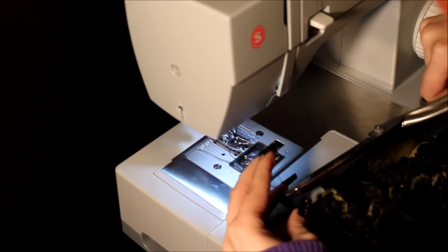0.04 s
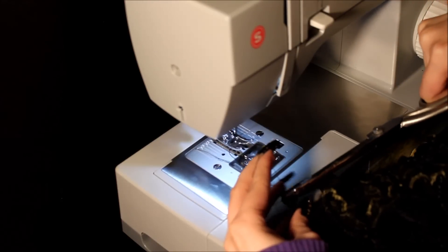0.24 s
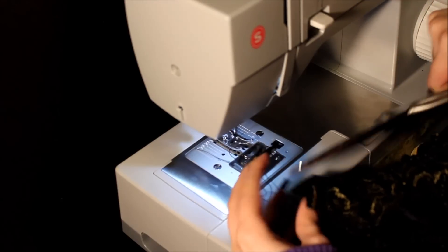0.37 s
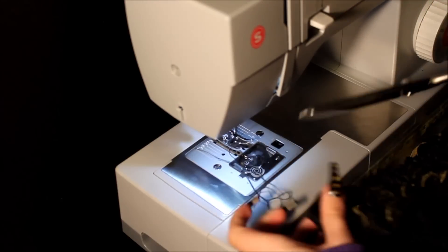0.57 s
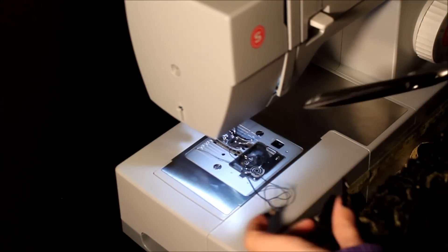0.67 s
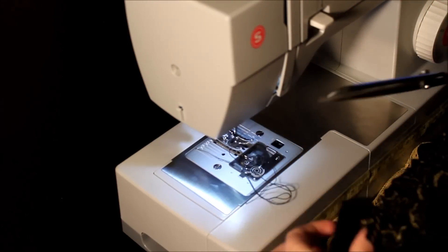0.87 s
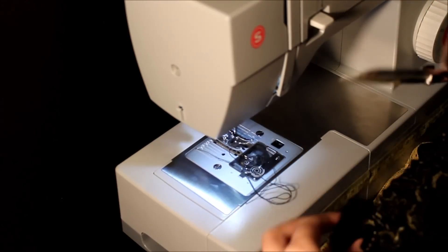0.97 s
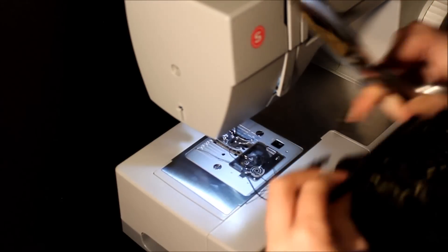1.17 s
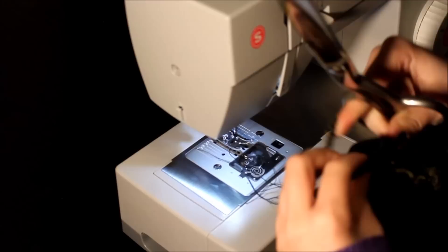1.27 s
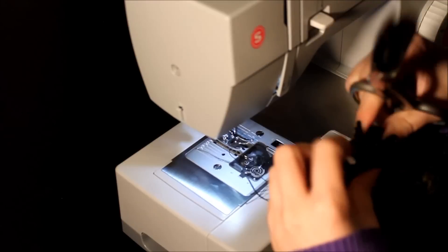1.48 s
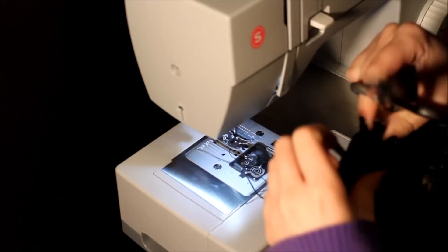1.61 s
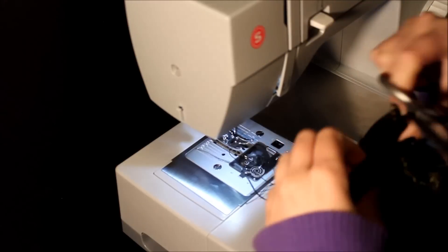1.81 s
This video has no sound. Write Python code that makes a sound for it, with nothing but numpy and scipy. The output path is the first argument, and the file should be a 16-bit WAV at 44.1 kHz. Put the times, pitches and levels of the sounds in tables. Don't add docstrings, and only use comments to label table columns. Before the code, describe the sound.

A sharp scissor snip, steel blades sliding open, then cloth rustle and a small thread snap.

```python
import sys
import numpy as np
from scipy import signal
from scipy.fft import rfft, irfft, next_fast_len
from scipy.io import wavfile
from scipy.ndimage import uniform_filter1d, map_coordinates

SR = 44100
rng = np.random.default_rng(int(sys.argv[2]) if len(sys.argv) > 2 else 0)


def generate_wav(signal):
    frames = np.transpose(np.atleast_2d(signal))
    scaled = np.clip(frames, -1, 1) * 32767
    pcm = np.round(scaled).astype(np.int16)
    wavfile.write(sys.argv[1], SR, pcm)


def rack_gain(trim_db):
    fader = np.asarray(trim_db, float)
    return 10 ** (fader / 20)


N = 81585


def unit(x):
    return x / np.sqrt(np.mean(x ** 2) + 1e-20)


def along(points, hz):
    f, v = np.transpose(points)
    return np.interp(np.log(hz + 1), np.log(f + 1), v)


def filtered(x, response):
    m = next_fast_len(len(x) + 8192)
    return irfft(rfft(x, m) * response(np.fft.rfftfreq(m, 1 / SR)), m)[:len(x)]


def resonant(x, peaks, shift=1):
    def response(f):
        total = 0
        for k, (centre, width, db) in enumerate(peaks):
            damping = 1j * f * width
            total = total + (-1) ** k * rack_gain(db) * damping / ((centre * shift) ** 2 - f * f + damping)
        return total
    return filtered(x, response)


def wobble(rate_hz, n):
    knots = rng.standard_normal(int(N * rate_hz / SR) + 4)
    return map_coordinates(knots, [np.arange(n) * rate_hz / SR])


def add(out, start_s, x):
    i = round(start_s * SR)
    out[i:i + len(x)] += x[:len(out) - i]


def stroke(length_s, rate_hz, grit_db, lean):
    n = int(2 * length_s * SR)
    u = np.arange(n) / SR / length_s
    shape = np.sin(np.pi * np.clip(u, 0, 1) ** lean) ** .6
    grit = rng.standard_normal(n) * rack_gain(grit_db * wobble(rate_hz, n))
    return unit(grit), shape


# pitch_hz, density_db
HISS_COLOUR = [(20, -50), (32, -35), (45, 0), (100, -20), (180, -5.5), (1000, -11), (5000, -14.5),
               (15900, -20.5)]
HUM_HZ, HUM_WIDTH_HZ, HUM_DB = 103, 11, -64
HISS_DB = -55.5


def floor():
    hiss = unit(filtered(rng.standard_normal(N), lambda hz: rack_gain(along(HISS_COLOUR, hz))))
    hum = unit(resonant(rng.standard_normal(N), [(HUM_HZ, HUM_WIDTH_HZ, 0)]))
    return rack_gain(HISS_DB + 0.21 * wobble(5.05, N)) * hiss + rack_gain(HUM_DB) * hum


# delay_s, level_db
NEAR_SURFACES = [(.0021, -10), (.004, -6), (.0074, -6), (.0092, -13), (.0111, -10), (.0125, -10),
                 (.0155, -14)]
# pitch_hz, t60_s
ROOM_DECAY = [(500, 0.17), (2000, 0.36), (6000, 0.21), (12000, .22), (16000, 0.19)]
ROOM_DB, ROOM_START_S = -1.5, 0.0013


def room(x):
    hz, t, z = signal.stft(rng.standard_normal(SR // 2), SR, nperseg=256)
    decay = rack_gain(-60 * t / along(ROOM_DECAY, hz)[:, None])
    tail = signal.istft(z * decay, SR, nperseg=256)[1]
    tail = tail * (1 - np.exp(-np.arange(len(tail)) / SR / ROOM_START_S))
    answer = rack_gain(ROOM_DB) * tail / np.linalg.norm(tail)
    smear = rng.standard_normal((len(NEAR_SURFACES), 8)) * rack_gain(-7 * np.arange(8))
    for (delay_s, db), echo in zip(NEAR_SURFACES, smear):
        add(answer, delay_s, rack_gain(db) * echo / np.linalg.norm(echo))
    answer[0] = 1
    return signal.fftconvolve(x, answer)[:N]


# start_s, level_db, pitch_hz
TABLE_NUDGES = [
    (0.131, -50.5, 75),
    (0.579, -46, 125),
    (.63, -47, 111),
    (1.209, -63, 94),
    (1.32, -51, 233),
]
THUMP_CYCLES = 1.95


def thumps():
    out, t = np.zeros(N), np.arange(SR // 5) / SR
    for start_s, db, hz in TABLE_NUDGES:
        u = t * hz / THUMP_CYCLES
        add(out, start_s, rack_gain(db) * 4 * u * np.exp(-2 * u) * np.sin(2 * np.pi * hz * t))
    return out


# start_s, length_s, level_db
FOLDS = [
    (1.028, 0.052, -60.5),
    (1.103, 0.044, -55.5),
    (1.168, 0.27, -65.5),
    (1.32, 0.079, -60),
    (1.606, 0.018, -57),
    (1.627, 0.024, -54.5),
    (1.671, .05, -57),
]
# pitch_hz, density_db
FOLD_COLOUR = [(400, -11), (2500, 0.5), (6000, -3), (12000, -2.5), (16000, -5.5)]


def rustles():
    out = np.zeros(N)
    for start_s, length_s, db in FOLDS:
        grit, shape = stroke(length_s, 900, grit_db=3, lean=.6)
        rustle = unit(filtered(grit, lambda hz: rack_gain(along(FOLD_COLOUR, hz))))
        add(out, start_s, rack_gain(db) * shape * rustle)
    return out


# start_s, length_s, level_db, fizz_db
CLOTH_PULLS = [
    (0.287, 0.048, -47, -9),
    (.32, 0.027, -52, -2),
    (.58, 0.14, -58.5, -3.5),
    (.97, 0.053, -59.5, 6),
    (1.247, 0.065, -50.5, 4.5),
    (1.29, 0.036, -47, 4.5),
    (1.32, 0.042, -54, 6.5),
]
# pitch_hz, width_hz, level_db
BED_MODES = [(235, 30, 0), (645, 50, -7), (855, 40, 2), (995, 45, -2), (1700, 300, -14)]
# pitch_hz, width_hz, level_db
WEAVE_FIZZ = [(2260, 2900, -14.5), (3330, 220, -1.5), (3420, 180, -1.5), (4260, 330, -2)]


def drags():
    out = np.zeros(N)
    for start_s, length_s, db, fizz_db in CLOTH_PULLS:
        grit, shape = stroke(length_s, 206.6, grit_db=3.0, lean=0.67)
        hum = resonant(grit * shape, BED_MODES)
        fizz = rack_gain(fizz_db - 10.5) * resonant(grit * shape, WEAVE_FIZZ)
        add(out, start_s, rack_gain(db) * 4 * (hum + fizz))
    return out


# start_s, level_db, pitch_hz, decay_cycles
TOUCHES = [(.599, -44, 13000, 3), (.826, -42, 4550, 3), (0.826, -42, 14700, 44), (1.010, -46, 14500, 25),
           (1.038, -44.5, 2500, 2.6), (1.038, -41, 12000, 4.4), (1.066, -42, 12500, 3),
           (1.1115, -31, 3700, 0.89), (1.111, -23, 13600, 2), (1.117, -40, 14500, 4),
           (1.134, -39, 11400, 4.8), (1.325, -36, 14000, 4.1), (1.348, -40.5, 11100, 5),
           (1.356, -48, 14000, 3), (1.381, -32.5, 12800, 3.3), (1.42, -33.5, 12500, 2.7),
           (1.608, -32, 830, 0.27), (1.6056, -37, 3000, 0.76), (1.6288, -31, 3420, 1.2),
           (1.6286, -41.5, 8000, 2), (1.683, -37.5, 1550, 0.68), (1.754, -42.5, 3580, 2.6)]


def ticks():
    out, t = np.zeros(N), np.arange(SR // 50) / SR
    for start_s, db, hz, cycles in TOUCHES:
        noise = unit(resonant(rng.standard_normal(len(t)), [(hz, hz / 3, 0)]))
        pulse = np.sin(2 * np.pi * hz * t) + .5 * noise
        add(out, start_s, rack_gain(db) * pulse * np.exp(-t * hz / cycles))
    return out


# start_s, level_db, pitch_factor
FIBRES = [
    (1.4744, -20, 1.35),
    (1.4771, -31, 1.05),
    (1.4783, -15, 1.0),
    (1.4812, -23, 1.05),
]
# pitch_hz, width_hz, level_db
THREAD_MODES = [(500, 500, -15), (1250, 400, -8), (2800, 1500, -6), (4700, 1800, 5), (7800, 2200, 4),
                (10200, 2000, 0), (13300, 2500, 0)]


def snaps():
    out, t = np.zeros(N), np.arange(SR // 100) / SR
    for start_s, db, pitch in FIBRES:
        fray = .4 * rng.standard_normal(len(t)) * rack_gain(-60 * t / 0.0021)
        burst = (t == 0) + fray
        add(out, start_s, rack_gain(db + 3.5) * resonant(burst, THREAD_MODES, pitch))
    return out


# start_s, length_s, level_db, pitch_factor
BLADE_RUBS = [
    (.157, .02, -52, 1.0),
    (.217, .005, -54, 1.0),
    (.598, .012, -48, 1.03),
    (.611, .022, -44, .99),
    (.680, .012, -52, .9),
    (.694, .02, -46, 1.005),
    (.710, .021, -46, 1.0),
    (.826, .008, -55, 1.03),
]
# pitch_hz, width_hz, level_db
RUBBED_STEEL = [(3360, 200, -4.5), (5100, 1000, -12), (7060, 350, -5), (9330, 510, -8), (10360, 390, -3.5),
                (11400, 350, -6.5), (12000, 660, -4), (13950, 370, 0), (14100, 140, -1), (15200, 600, -16)]
RUB_DB = 7.5


def slides():
    out = np.zeros(N)
    for start_s, length_s, db, pitch in BLADE_RUBS:
        grit, shape = stroke(length_s, 600, grit_db=3, lean=.75)
        add(out, start_s, rack_gain(db + RUB_DB) * resonant(grit * shape, RUBBED_STEEL, pitch))
    return out


# start_s, level_db, contact_s
BLADE_CONTACTS = [
    (.1590, -41, .0012),
    (.22185, -10, .0003),
]
# pitch_hz, level_db, t60_s
BLADE_MODES = [(3000, -8, .009), (3800, -1, .005), (4700, -2, .005), (5300, -7, .004), (6400, -1, .005),
               (7700, 2, .004), (9600, 8, .005), (11250, -2, .012), (11600, -2, .012), (12300, 2, .004),
               (12700, -3, .013), (13600, 1, .004), (14200, -1, .013), (15200, -3, .004)]
# pitch_hz, level_db, t60_s
HANDLE_KNOCK = [(830, -38, 0.0037), (1220, -27.5, 0.0026), (1630, -17, 0.0054)]
CRACK_DB, CRACK_T60_S = 4, .006
THIN_HZ = 700


def snips():
    out, t = np.zeros(N), np.arange(SR // 8) / SR
    for start_s, db, contact_s in BLADE_CONTACTS:
        ring = np.zeros(len(t))
        for hz, level, t60 in BLADE_MODES:
            ring += rack_gain(level - 60 * t / t60) * np.sin(2 * np.pi * (hz * t + rng.random()))
        crack = rack_gain(CRACK_DB - 60 * t / CRACK_T60_S) * np.diff(rng.standard_normal(len(t) + 1))
        knock = np.zeros(len(t))
        for hz, level, t60 in HANDLE_KNOCK:
            knock += rack_gain(level - 60 * t / t60) * np.sin(2 * np.pi * hz * t)
        onset = 1 - np.exp(-t / contact_s)
        add(out, start_s, rack_gain(db - 1.5) * (onset * (ring + crack) + knock))
    return signal.sosfilt(signal.butter(3, THIN_HZ, 'high', fs=SR, output='sos'), out)


NEAR_DB = -5


def scene():
    near = ticks()
    blades = room(snips())
    rubbing = room(slides() + drags() + rustles())
    small = room(snaps() + rack_gain(NEAR_DB) * near) + (1 - rack_gain(NEAR_DB)) * near
    mono = blades + rubbing + small + thumps() + floor()
    return np.array([mono, mono])


def below(hz, top_hz):
    return np.sin(np.pi / 2 * np.clip((top_hz - hz) / 250 + .5, 0, 1)) ** 2


def roll_off(x):
    return signal.sosfilt(signal.butter(12, 17160, fs=SR, output="sos"), x)


DUCK_S, DUCK_DB, HOLD_S, RECOVER_S = 0.23, -3.5, 0.19, 0.29
RISE_DB = 0.5
TOP_HZ, LOUD_TOP_HZ, LOUD_DB = 15800, 16950, -25
SPILL_LOW_DB, SPILL_HIGH_DB = -49, -30


def record(dry):
    t = np.arange(N) / SR - DUCK_S
    duck = (t > 0) * np.clip(1 - (t - HOLD_S) / RECOVER_S, 0, 1)
    x = dry[0] * rack_gain(DUCK_DB * duck + RISE_DB * np.clip(t, 0, 1))

    power = uniform_filter1d(x * x, size=150)
    loud = uniform_filter1d(1. * (power > rack_gain(LOUD_DB) ** 2), size=300)
    top = filtered(x, lambda hz: (1 - below(hz, TOP_HZ)) * rack_gain(-12 * np.abs(hz - TOP_HZ) / 1000))
    x = filtered(x, lambda hz: below(hz, TOP_HZ)) + filtered(loud * top, lambda hz: below(hz, LOUD_TOP_HZ))

    def spill(hz):
        return rack_gain(np.where(hz > 4000, SPILL_HIGH_DB * (1 + hz / 40000), SPILL_LOW_DB))

    side = filtered(np.roll(x, 37) * (.02 + loud), spill)
    return roll_off(np.array([x + side, x - side]))


dry = scene()
out = record(dry)
generate_wav(out)
```